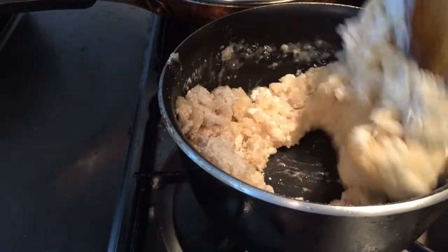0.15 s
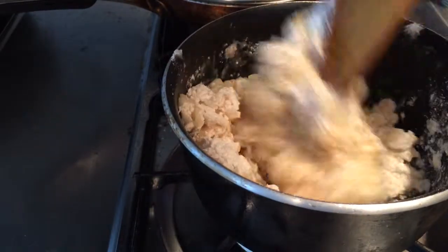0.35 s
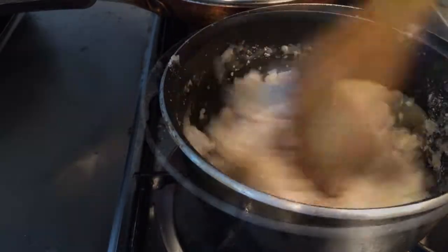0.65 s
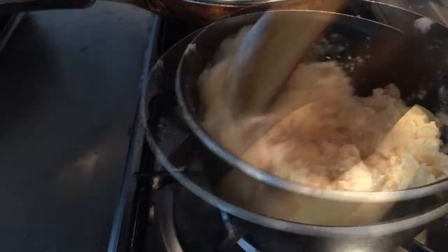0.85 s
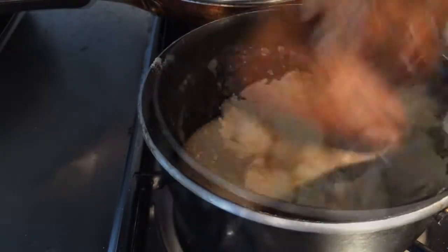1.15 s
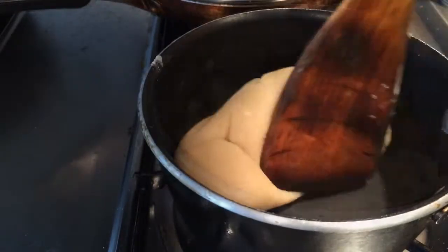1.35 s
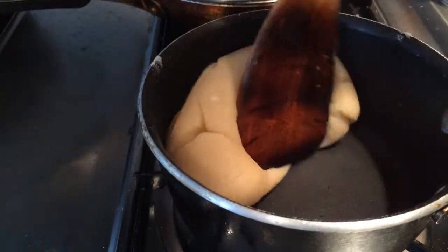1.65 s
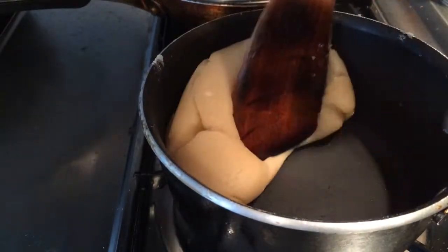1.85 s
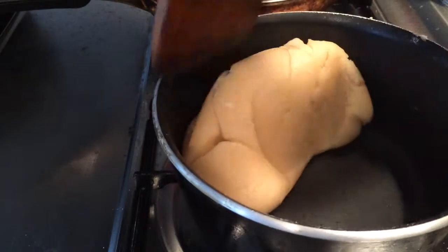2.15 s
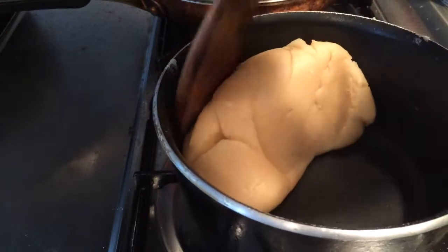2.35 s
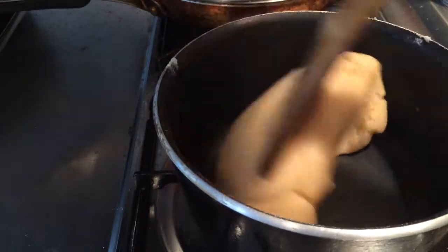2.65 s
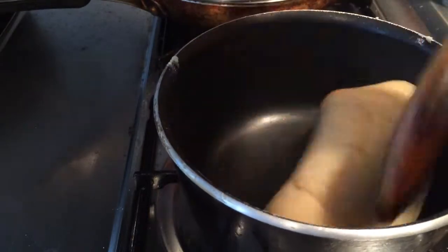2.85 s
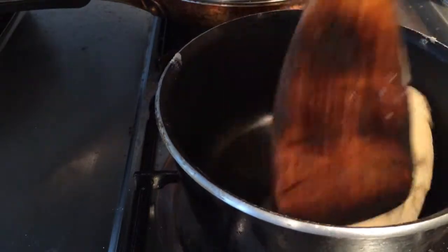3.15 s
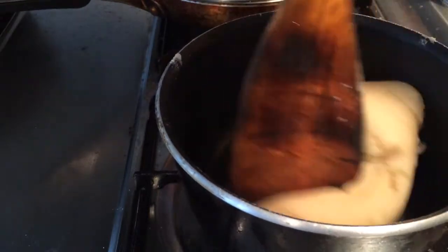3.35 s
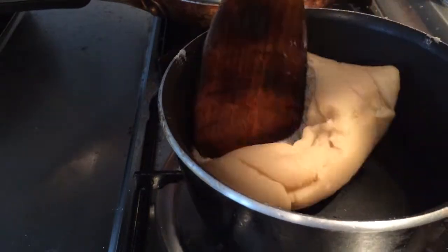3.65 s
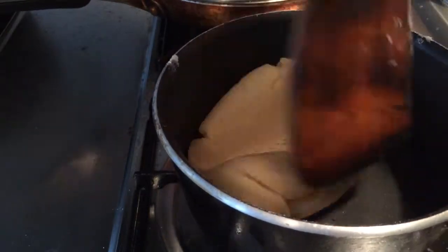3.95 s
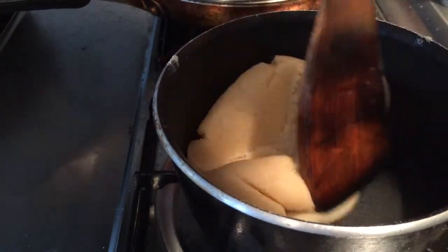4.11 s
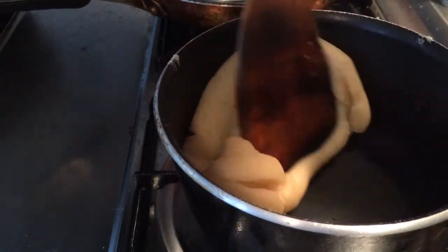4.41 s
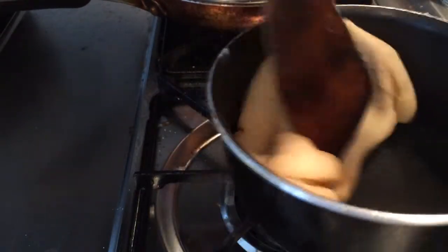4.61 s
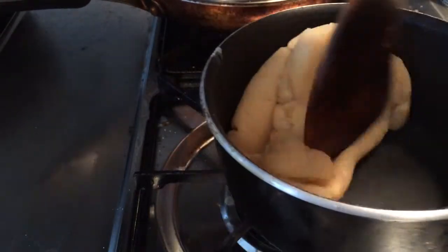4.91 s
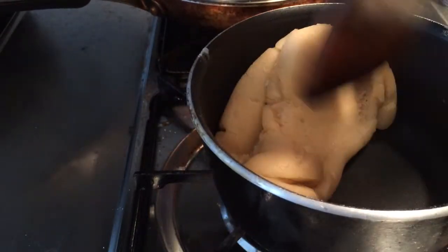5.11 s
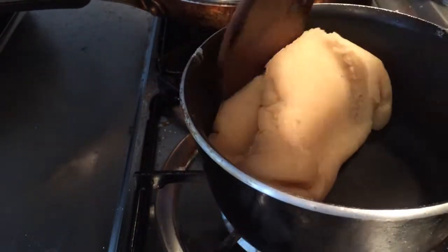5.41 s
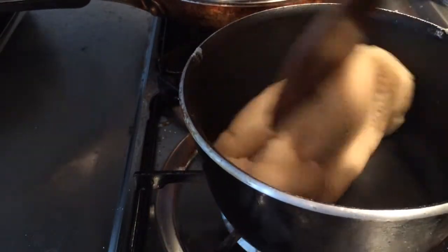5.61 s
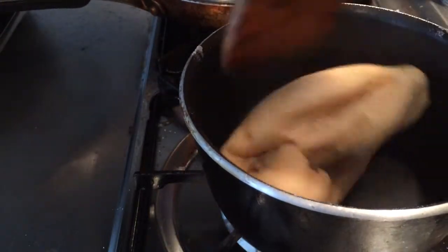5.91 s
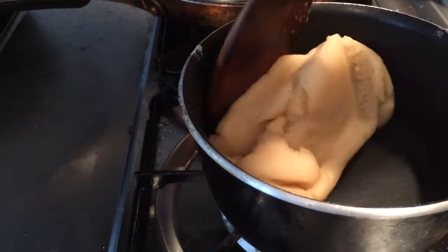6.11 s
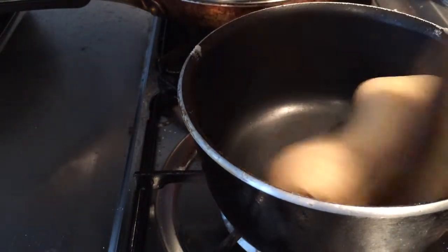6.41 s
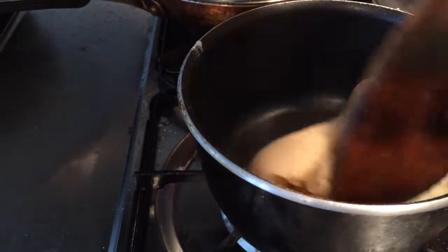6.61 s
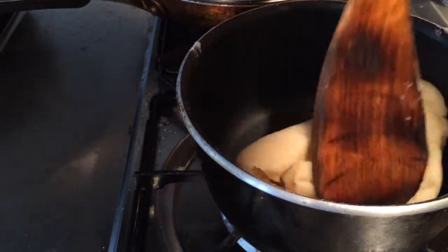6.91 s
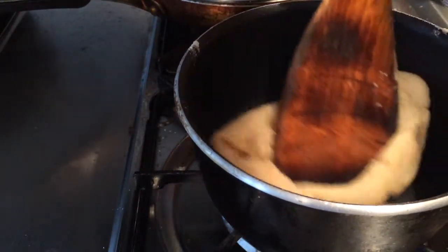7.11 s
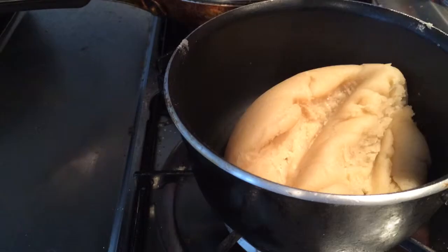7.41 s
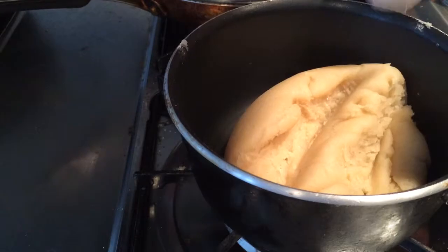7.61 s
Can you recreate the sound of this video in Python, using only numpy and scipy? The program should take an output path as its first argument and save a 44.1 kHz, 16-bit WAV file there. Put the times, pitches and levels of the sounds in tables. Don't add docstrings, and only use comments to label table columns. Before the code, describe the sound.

Close to a phone microphone in a small kitchen, a wooden spoon drags through crumbly dough with hiss, snaps and a faint gas whistle. The whistle and crumbs stop after about a second. Dull, short wood knocks make the pan ring, with scrapes between. Hard shoves rock and crack the pan on its grate midway, a very firm knock follows, then a tiny dropout and a bright, hard set-down.

```python
import sys
import numpy as np
from scipy import signal
from scipy.fft import rfft, irfft, next_fast_len
from scipy.io import wavfile
from scipy.ndimage import uniform_filter1d

SR = 44100
rng = np.random.default_rng(int(sys.argv[2]) if len(sys.argv) > 2 else 0)


def waveform_to_disk(signal):
    frames = np.transpose(np.atleast_2d(signal))
    scaled = np.clip(frames, -1, 1) * 32767
    samples = np.round(scaled).astype(np.int16)
    wavfile.write(sys.argv[1], SR, samples)


def convert_level_to_amplitude(level_db):
    exponent = np.asarray(level_db, float) / 20
    return 10 ** exponent


N = 342237
SWELL_DB = -16


def power(db):
    return convert_level_to_amplitude(2 * db)


def evened(x):
    return x / np.sqrt(np.mean(x ** 2) + 1e-20)


def read(points, hz):
    point_hz, value = np.transpose(points)
    return np.interp(np.log(hz + 1), np.log(point_hz + 1), value)


def add(mix, s, sound):
    part = mix[round(s * SR):][:len(sound)]
    part += sound[:len(part)]


def band(x, edges):
    return signal.sosfilt(signal.butter(3, edges, "bandpass", fs=SR, output="sos"), x)


def colour(x, spectrum):
    size = next_fast_len(len(x), real=True)
    gain = convert_level_to_amplitude(read(spectrum, np.fft.rfftfreq(size, 1 / SR)))
    return irfft(rfft(x, size) * gain, size)[:len(x)]


def resonate(x, peaks, through):
    size = next_fast_len(len(x), real=True)
    f = np.fft.rfftfreq(size, 1 / SR)
    gain = through + sum(convert_level_to_amplitude(db) / (1 + 2j * (f - hz) / width) for hz, width, db in peaks)
    return irfft(rfft(x, size) * gain, size)[:len(x)]


def patchy(spectrum, patch_db, flicker_db):
    frames, hz = N // 128 + 5, np.fft.rfftfreq(512, 1 / SR)
    real, imaginary, patches = rng.standard_normal((frames, 257, 3)).T
    patches = uniform_filter1d(patches, size=8, axis=0)
    patches = evened(uniform_filter1d(patches, size=14, axis=1))
    flicker = evened(uniform_filter1d(rng.standard_normal(frames), size=4))
    level_db = read(spectrum, hz)[:, None] + patch_db * patches + flicker_db * flicker
    bins = (real + 1j * imaginary) * convert_level_to_amplitude(level_db)
    return signal.istft(bins, nperseg=512, noverlap=384)[1][:N]


def slips(per_s, spread_db):
    size = convert_level_to_amplitude(spread_db * np.minimum(rng.exponential(1, N), 4))
    sign = rng.choice([-1., 1.], N)
    return evened(size * sign * (rng.random(N) < per_s / SR))


def swells(rows):
    t = np.arange(0, N / SR, 1 / 1000)
    peak_s, db, swell_s, fade_s = np.array(rows).T[:, :, None]
    away = np.where(t < peak_s, (peak_s - t) / swell_s, (t - peak_s) / fade_s)
    roundness = 1.135
    total = (convert_level_to_amplitude(db + SWELL_DB * away ** roundness) ** 2).sum(0)
    return np.interp(np.arange(N) / SR, t, total)


# pitch in Hz, level in dB per Hz.
AIR = [(15, -51), (25, -16.5), (120, -0.5), (170, -17.5), (235, -6.5), (307, -6.5), (333, -17), (461, -16),
       (557, -17.5), (3680, -32), (4100, -28.5), (4450, -35.5), (15800, -37)]
# pitch in Hz, level in dB.
HUM = [(145.3, -72), (193.8, -66.5), (457.6, -72.5), (2105, -85.5), (3144, -90.5), (4124, -82)]
# time in seconds, level in dB.
WHISTLE = [
    (0, -67),
    (.9, -66),
    (1.1, -100),
    (8, -100),
]


def kitchen():
    t, white = np.arange(N) / SR, rng.standard_normal(N)
    draught = patchy([(20, 0), (20000, 0)], 2.0, .8)
    air = convert_level_to_amplitude(-59) * evened(colour(draught, AIR))
    width_hz = 4.4
    hum = resonate(white, [(hz, width_hz, db) for hz, db in HUM], 0) / np.sqrt(np.pi * width_hz / SR)
    whistle = evened(resonate(white, [(5790, 120, 0)], 0))
    return air + hum + convert_level_to_amplitude(np.interp(t, *np.transpose(WHISTLE))) * whistle


# peak in seconds, pressure in dB, swell in seconds, fade in seconds.
DRAGS = [(0.0, -42.5, .05, 0.13), (.078, -42.5, .06, 0.059), (.5, -55, .1, .15), (.805, -44, 0.044, .16),
         (.97, -42.5, .04, 0.16), (1.31, -51.5, .09, .1), (1.42, -54, .08, 0.27), (1.848, -62, .05, 0.052),
         (2.32, -58.5, .12, 0.28), (2.888, -59, .09, 0.15), (3.33, -55.5, .04, 0.13),
         (3.47, -52.5, .1, 0.051), (3.71, -52.5, .045, 0.067), (3.87, -48, .1, 0.073),
         (4.07, -67, .15, .15), (4.572, -42, .012, .02), (4.545, -60, .09, .05), (4.643, -29, .025, 0.016),
         (4.71, -34, .08, 0.017), (5.34, -55, .06, 0.22), (5.812, -59, .09, 0.092), (5.91, -62, .06, .03),
         (6.17, -48, .06, .18), (6.5, -51.5, .07, 0.063), (7.26, -62, .14, .06)]
# peak in seconds, pressure in dB,
# swell in seconds, fade in seconds, share felt on the base in dB.
BITES = [(.28, -55, .3, 0.54, 0), (.694, -51, .075, 0.15, -0.5), (1.19, -58, 0.06, 0.092, -9),
         (1.962, -35.5, 0.024, 0.09, -12.5), (2.015, -37, 0.059, 0.055, -10), (2.07, -52, .03, .05, 2),
         (2.605, -56, 0.1, 0.056, -5.5), (3.152, -62, .01, 0.053, -3), (3.284, -50.5, 0.018, 0.06, 1.5),
         (3.588, -46, 0.075, 0.048, 4.5), (4.589, -34, 0.017, 0.11, -2.5), (4.67, -38, .04, 0.084, 5.5),
         (4.81, -46.5, .1, 0.08, -4.5), (5.108, -44, 0.15, 0.056, -3), (5.505, -50.5, 0.18, .035, -1),
         (5.63, -61, 0.13, 0.16, -3.5), (6.612, -50, 0.023, 0.074, -2), (7.068, -61.5, 0.075, 0.079, -3.5),
         (7.347, -36.5, 0.035, 0.12, -3.5), (7.5, -59, .1, .15, -6)]


def spoon_pressure():
    drags = swells(DRAGS)
    bites = swells([row[:4] for row in BITES])
    bites_on_base = swells([(s, db + share_db, swell_s, fade_s) for s, db, swell_s, fade_s, share_db in BITES])
    return drags, bites, drags + bites_on_base


# pitch in Hz, level in dB per Hz.
RUB = [(180, -42), (300, -11.5), (484, 0), (937, 4.5), (1280, 2.5), (2880, -3.5), (3020, -7.5), (4570, -8),
       (7620, -10), (15500, -21)]
# pitch in Hz, width in Hz, level in dB.
RUB_RING = [(659, 77, -10), (962.5, 90, -3), (1682, 90, -4), (1979, 30, -0.5), (2170, 72, -7.5),
            (3140, 260, -1.5), (3554, 340, -3), (5100, 160, -8), (6280, 200, -11.5), (7740, 540, -3.5)]


def scrape(drags, bites, on_base):
    rub = evened(colour(slips(5000, 2.5), RUB)) + 1.2 * evened(patchy(RUB, 4.0, 1.0))
    pan = resonate(rub, RUB_RING, 0.69)
    base, side = band(pan, (300, 1800)), band(pan, (1800, 9000))
    on_side = bites + drags * power(-5)
    return np.sqrt(on_base) * evened(base) + np.sqrt(on_side) * evened(side)


# pitch in Hz, level in dB per Hz.
HISS = [(1180, -35), (2000, -7.5), (2410, -15), (3670, -6), (4180, -7.5), (5590, -3), (13600, -1.5),
        (15500, -3.5)]
# peak in
# seconds, hiss in dB, swell in seconds, fade in seconds.
PEELS = [(0.0, -46.5, .05, 0.18), (.22, -55, 0.43, 0.65), (.6, -60.5, 0.33, 0.62), (1.02, -46, 0.15, 0.1),
         (1.69, -64.5, 0.2, 0.16), (1.79, -56.5, 0.071, 0.1), (2.38, -65, .12, 0.085),
         (2.598, -43, 0.069, 0.09), (2.888, -59, 0.38, 0.037), (3.5, -58, 0.28, .1), (3.76, -69, 0.13, .1),
         (3.83, -48.5, 0.057, 0.034), (3.954, -59.5, 0.036, .045), (4.112, -62.5, .07, 0.065),
         (4.43, -57, 0.19, .3), (4.54, -53.5, 0.092, .1), (4.655, -31, 0.063, 0.03),
         (5.33, -59.5, 0.036, .2), (5.614, -48.5, 0.083, 0.18), (5.8, -58.5, 0.22, 0.037),
         (6.01, -57, 0.13, 0.14), (6.07, -48, .02, .08), (1.365, -50, .02, .08), (6.29, -55, 0.038, 0.18),
         (6.49, -52.5, 0.088, .05), (7.2, -59.5, 0.13, 0.23), (6.72, -66.5, 0.13, 0.11)]


def dough_hiss(drags, bites):
    hiss = evened(patchy(HISS, 2.5, 2.9)) + 0.33 * evened(colour(slips(1500, 4.0), HISS))
    peeling = swells(PEELS) + drags * power(-11.5) + bites * power(-5.5)
    return np.sqrt(peeling) * evened(hiss)


# pitch in Hz, level in dB per Hz.
ROCK = [(15, -49), (35, -18), (70, 0), (200, 0), (267, -12), (354, -2.5), (418, -14.5), (700, -7.5),
        (910, -32.5), (1540, -120)]
# pitch in Hz, width in Hz, level in dB.
ROCK_RING = [(68.4, 25, -0.5), (147, 30, -3.5), (217, 17, 1), (233, 19, -4.5), (345, 66, -6),
             (420, 25, -5.5)]
# peak in seconds, level in dB, fade in seconds.
SHOVES = [(.04, -46.5, 0.19), (.5, -48, 0.22), (1.33, -50, 0.28), (1.7, -58, 0.55), (2.27, -57, 0.16),
          (3.32, -47.5, 0.17), (3.86, -40.5, 0.092), (4.02, -56.5, 0.11), (4.6, -41.5, 0.09),
          (4.68, -30, 0.069), (6.15, -53, 0.17), (7.356, -50, 0.16)]


def rocking(on_base):
    bumps = resonate(colour(slips(600, 2.0), ROCK), ROCK_RING, .4)
    shoves = swells([(s, db, .55 * fade_s, fade_s) for s, db, fade_s in SHOVES])
    moving = shoves + on_base * power(-9.5) + power(-64.5)
    return np.sqrt(moving) * evened(bumps)


def strokes():
    drags, bites, on_base = spoon_pressure()
    return scrape(drags, bites, on_base) + dough_hiss(drags, bites) + rocking(on_base)


# peak in seconds, level in dB,
# swell in seconds, fade in seconds, pitch in Hz.
SINGS = [(.05, -52, .06, .08, 3400), (.08, -50, .05, .05, 1500), (.81, -54, .03, .1, 3700),
         (.81, -50, .03, .08, 950), (.98, -52, .04, .09, 2150), (1.01, -54, .07, .06, 6250),
         (1.01, -54, .07, .06, 7700), (1.31, -60, .06, .04, 3100), (1.965, -40, .018, .03, 3050),
         (2.008, -37, .03, .03, 3310), (2.03, -43, .03, .05, 3050), (1.985, -41, .03, .04, 5100),
         (2.0, -44, .05, .07, 1720), (1.99, -47, .05, .05, 7700), (2.02, -48, .03, .05, 807),
         (3.59, -50, .05, .05, 980), (4.645, -26, .02, .03, 974), (4.61, -37, .03, .03, 2940),
         (4.655, -35, .03, .03, 3000), (4.65, -36, .03, .04, 7490), (4.61, -40, .03, .05, 5800),
         (4.7, -30, .015, .02, 974), (4.72, -44, .03, .06, 3200), (4.812, -41, .01, .025, 1670),
         (5.1, -50, .04, .04, 904), (5.1, -49, .06, .04, 1990), (5.08, -52, .05, .05, 3630),
         (5.1, -55, .04, .04, 2720), (5.07, -55, .05, .06, 5630), (5.48, -50, .08, .07, 1990),
         (5.5, -51, .08, .04, 958), (5.4, -60, .06, .04, 1560), (5.84, -58, .06, .07, 980),
         (6.61, -46, .015, .04, 1800), (6.63, -46, .03, .04, 1670), (6.495, -52, .03, .02, 950),
         (7.355, -42, .03, .06, 1990), (7.355, -43, .03, .05, 900), (6.61, -55, .02, .03, 5300)]


def singing():
    out, grit = np.zeros(N), rng.standard_normal((len(SINGS), 12000))
    t = np.arange(-6000, 6000) / SR
    for (s, db, swell_s, fade_s, hz), noise in zip(SINGS, grit):
        mode = evened(resonate(noise, [(hz, .04 * hz, 0)], 0))
        away = np.where(t < 0, -t / swell_s, t / fade_s)
        sound = mode * convert_level_to_amplitude(db - 4.5 + SWELL_DB * away ** 2)
        early = max(6000 - round(s * SR), 0)
        add(out, s - (6000 - early) / SR, sound[early:])
    return out


# time in seconds, peak in dB, pitch in Hz.
SNAPS = [(0.2094, -39, 5750), (0.2444, -41, 2110), (0.3094, -39, 5760), (0.3694, -42, 3210),
         (0.5294, -35, 2200), (0.6539, -37, 2040), (0.6894, -35, 2000), (0.7154, -33, 4210),
         (1.1464, -45, 5780), (1.1892, -44, 3350), (1.4094, -40, 2050), (1.5944, -46, 2070),
         (1.7114, -46, 2270), (1.7394, -50, 2310), (2.3545, -42, 11000), (2.5311, -36, 11700),
         (2.7322, -41, 11500), (2.7467, -41, 12900), (2.8609, -45, 11200), (4.1011, -40, 12200),
         (4.4089, -38, 8040), (4.5191, -36, 13200), (5.7894, -39, 7530), (5.8094, -49, 2300),
         (5.9344, -43, 12000), (6.2244, -45, 2300)]
# time in seconds, peak in dB, pitch in Hz.
CRACK = (4.6923, 0, 3200)
# time in seconds, level in dB.
CRUMBS = [
    (0, -60),
    (.5, -60),
    (1.0, -62),
    (1.3, -78),
    (7.7, -80),
]


def snaps():
    out, t = np.zeros(N), np.arange(300) / SR
    for s, db, hz in SNAPS + [CRACK]:
        add(out, s, convert_level_to_amplitude(db - 8) * np.sin(2 * np.pi * hz * t) * np.exp(-t * hz / 1.5))
    crackle = evened(band(slips(150, 4.0), (900, 12000)))
    return out + crackle * convert_level_to_amplitude(np.interp(np.arange(N) / SR, *np.transpose(CRUMBS)))


BLOW_BANDS = [
    (900, 2200),
    (60, 400),
    (400, 900),
    (2200, 5500),
    (5500, 15500),
]


def blow(row, modes, contact_s, rattle_db, crack_s, scatter_db, scatter_s, spread_db, dull_hz, treble_s):
    s, body_db, *others_db = row
    t = np.arange(5000) / SR
    luck, turn = rng.standard_normal(len(modes)), rng.random(len(modes))
    rung = np.zeros(len(t))
    for (hz, db, t60), u, start in zip(modes, luck, turn):
        rung += convert_level_to_amplitude(db + spread_db * u - 60 * t / t60) * np.sin(2 * np.pi * (hz * t + start))
    fall = np.exp(-t / crack_s) + convert_level_to_amplitude(scatter_db) * np.exp(-t / scatter_s)
    rattle = rng.standard_normal(len(t)) * fall
    sound = (rung + convert_level_to_amplitude(rattle_db) * rattle) * np.minimum(t / contact_s, 1) ** 2
    sound[round(contact_s * SR)] += convert_level_to_amplitude(rattle_db + 16)
    pole = np.exp(-2 * np.pi * dull_hz / SR)
    sound = signal.lfilter([1], np.convolve([1, -pole], [1, -pole]), sound)
    parts = [band(sound, edges) for edges in BLOW_BANDS]
    parts[-1] = parts[-1] * np.exp(-t / treble_s)
    out = np.zeros(len(t))
    for part, db in zip(parts, (0, *others_db)):
        loudest = np.sqrt(uniform_filter1d(part ** 2, size=260).max())
        out += convert_level_to_amplitude(body_db + db - 8.5) * part / loudest
    return s, out


# time in seconds, force in dB, then heft on the hob,
# hollow wood and hard edge in dB relative to force.
KNOCKS = [(0.4888, -24, -18, -3.5, -7.5), (0.4924, -26, -23, -3.5, -10.5), (1.3484, -9, -26, -11.5, -7.5),
          (1.3604, -18, -16.5, -5, -19), (2.4074, -24, -30, -2.5, -9.5), (3.4387, -27.5, -27, -0.5, -12),
          (3.4438, -27.5, -24, -14, -15), (3.8348, -25, 1, -4, -7.5), (3.8536, -19.5, -8, -5.5, -9),
          (3.8584, -21, -9, -5.5, -9), (4.5735, -21, -3.5, -8.5, 1.5), (4.6737, -17.5, -15.5, -5.5, -1.5),
          (6.0513, -2.5, -31, -13.5, -4), (6.0572, -7.5, -25.5, -9.5, -12),
          (6.0955, -17.5, -18, -4.5, -14.5), (6.1176, -21.5, -7, 0, -7), (6.5146, -21, -21.5, -4, -17.5)]
# time in seconds, force in dB, then hollow wood and hard edge
# in dB relative to force.
TAPS = [
    (0.5689, -37.5, -0.5, -10),
    (1.297, -37.5, -2, -12.5),
    (1.6556, -52, -7, -13),
    (1.8372, -48, 1, -17),
    (2.2739, -46.5, 8, -4.5),
    (3.1515, -52, 6, -3),
    (3.2685, -50, -9, 2),
    (6.039, -44.5, -6, -11.5),
    (3.706, -44, -3, -10),
]
# pitch in Hz, level in dB, time to fall 60 dB in seconds.
WOOD = [(466, -11, 0.029), (693, -7.5, 0.028), (876, -10.5, 0.035), (1076, -11, 0.034), (1270, -5.5, 0.026),
        (1575, -4.5, 0.026), (1786, -6, 0.019), (2283, -11, 0.039), (3070, -7, 0.041), (3515, -15, 0.045),
        (4430, -15.5, 0.024), (4935, -22, .03), (6300, -23.5, .03), (7800, -21.5, .03),
        (9600, -17.5, 0.048)]


def knocks():
    out = np.zeros(N)
    rows = [(s, db, heft, hollow, edge, edge - 8.5) for s, db, heft, hollow, edge in KNOCKS]
    rows += [(s, db, -9, hollow, edge, edge - 3.5) for s, db, hollow, edge in TAPS]
    for row in rows:
        add(out, *blow(row, WOOD, contact_s=0.00042, rattle_db=0.62, crack_s=0.0073, scatter_db=-13.5,
                       scatter_s=0.028, spread_db=2.5, dull_hz=3500, treble_s=.007))
    return out


def ring_out(rows):
    out, t = np.zeros(N), np.arange(14000) / SR
    for s, hz, db, t60 in rows:
        pair = np.sin(2 * np.pi * hz * t) + 0.33 * np.sin(2 * np.pi * hz * 1.012 * t)
        add(out, s, convert_level_to_amplitude(db - 60 * t / t60) * pair * np.minimum(t / 0.00033, 1))
    return out


# time in seconds, pitch in Hz,
# level in dB, time to fall 60 dB in seconds.
PAN_RINGS = [(.489, 1047, -26, 0.054), (.489, 645, -36, 0.18), (.489, 2900, -39, 0.084),
             (.489, 1370, -29, 0.046), (1.349, 953, -39.5, 0.42), (1.35, 1240, -27, 0.15),
             (1.349, 1500, -12, 0.028), (2.273, 474, -39, 0.079), (2.408, 690, -17.5, 0.026),
             (2.408, 2627, -39, .035), (3.44, 2700, -42, .04), (6.516, 3300, -40, .025),
             (6.516, 1450, -30, .03), (6.517, 2300, -36, .04), (3.44, 683, -42, 0.35),
             (3.44, 986, -35, 0.047), (3.852, 2930, -33, 0.094), (3.854, 1987, -44, 0.3),
             (3.854, 792, -33.5, 0.15), (4.575, 2240, -25, 0.048), (4.575, 575, -26, 0.029),
             (6.0515, 1265, -11.5, .055), (6.0515, 1825, -14, .03), (6.0515, 4409, -27, .06),
             (6.0515, 2288, -25, .08), (6.0515, 3542, -30, .05), (6.052, 482, -24, 0.091),
             (6.052, 567, -21.5, 0.051), (6.096, 720, -21.5, 0.035), (6.118, 600, -33, 0.06),
             (6.517, 483, -34, 0.089), (6.517, 2720, -36, 0.035), (6.517, 1710, -35, 0.066),
             (6.517, 880, -26, 0.02), (1.35, 480, -23, .09), (1.349, 1114, -31, .11),
             (1.349, 1965, -24, .07), (1.349, 3564, -32, .05), (1.349, 2261, -36, .2),
             (3.44, 1674, -40, .1), (3.44, 1986, -41, .09), (3.44, 2266, -44, .09), (1.298, 900, -39, .03),
             (6.605, 1850, -42, .05)]


def pan_rings():
    return ring_out(PAN_RINGS)


# time in seconds, force in dB, then heft, edge and tick
# in dB relative to force.
CLANKS = [
    (0.7058, -37, -18, -2.5, -17),
    (3.2814, -41.5, 3, 5.5, 8),
    (4.596, -28, -18, -6, 2),
    (4.692, -18, -16, 6.5, 0),
    (4.81, -35, -20, -5, -8),
    (7.6615, -18.5, -7, -5, -17),
]
# time in seconds, force in dB, then edge and tick in dB relative to force.
RIM_TOUCHES = [
    (1.77, -38, 5.5, 7.5),
    (3.811, -43, -1.5, 5),
    (7.623, -60, 8, 10),
]
# pitch in Hz, level in dB, time to fall 60 dB in seconds.
STEEL = [(824, -11.5, 0.048), (1462, -7.5, 0.046), (2356, -12, .04), (3150, -14.5, 0.027), (3554, -7, 0.02),
         (4680, -16.5, 0.012), (6410, -3.5, 0.033), (8100, 6, 0.02), (8690, -3, 0.067), (9960, 0.5, 0.025),
         (12250, 2, 0.034)]


def clanks():
    out = np.zeros(N)
    rows = [(s, db, heft, -5, edge, tick) for s, db, heft, edge, tick in CLANKS]
    rows += [(s, db, -20, -20, edge, tick) for s, db, edge, tick in RIM_TOUCHES]
    for row in rows:
        add(out, *blow(row, STEEL, contact_s=.0005, rattle_db=4.3, crack_s=0.0039, scatter_db=-16.0,
                       scatter_s=0.014, spread_db=2.5, dull_hz=12000, treble_s=.012))
    return out


# time in seconds, pitch in Hz, level in dB,
# time to fall 60 dB in seconds.
GRATE_RINGS = [
    (1.352, 152.5, -35, 0.27),
    (3.27, 241, -40.5, 0.4),
    (3.271, 454, -53, 0.46),
    (3.275, 550, -48.5, 0.35),
    (3.836, 181, -31, 0.15),
    (4.576, 173, -21.5, 0.057),
    (4.575, 320, -26.5, 0.031),
    (6.051, 136, -36.5, 0.035),
]


def grate_rings():
    return ring_out(GRATE_RINGS)


# time in seconds, force in dB, then heft, hollow,
# edge and tick in dB relative to force.
SET_DOWN = (7.644, -11, -12.5, -6, 2.5, 7.5)
# pitch in Hz, level in dB, time to fall 60 dB in seconds.
SET_DOWN_RING = [(84.5, -38.5, .25), (1950, -30.5, 0.23), (3560, -24, 0.052), (4880, -45, 0.25),
                 (6600, -41, 0.14), (8043, -19, .045), (9895, -26, .07), (11340, -20, .023)]


def set_down():
    out = ring_out([(7.647, *mode) for mode in SET_DOWN_RING])
    add(out, *blow(SET_DOWN, STEEL, contact_s=0.002, rattle_db=4.1, crack_s=0.0041, scatter_db=-13.0,
                   scatter_s=0.018, spread_db=0.6, dull_hz=13000, treble_s=.012))
    return out


# pitch in Hz, time to fall 60 dB in seconds.
ROOM = [(100, 0.4), (500, 0.28), (1500, 0.37), (4000, .33), (10000, 0.21)]
# pitch in Hz, level in dB.
WALLS = [(300, 0), (2000, 0), (6000, 0), (12000, -2)]


def room(x):
    taps = np.zeros(SR // 2)
    at = np.arange(150, len(taps) - 20, 20)
    taps[at + rng.integers(0, 20, len(at))] = rng.choice([-1., 1.], len(at))
    hz, t, bins = signal.stft(taps, SR, nperseg=256)
    dying = bins * convert_level_to_amplitude(-60 * t / read(ROOM, hz)[:, None])
    tail = signal.istft(dying, SR, nperseg=256)[1]
    return signal.fftconvolve(colour(x, WALLS), tail / np.linalg.norm(tail))[:N]


def scene():
    air, rubs = kitchen(), strokes()
    fine = singing() + snaps()
    hits = knocks() + pan_rings() + clanks() + grate_rings() + set_down()
    echo = room(convert_level_to_amplitude(-13.5) * hits + convert_level_to_amplitude(-16) * rubs)
    return (hits + rubs + echo + air + fine)[None]


def band_limit(x):
    return signal.sosfilt(signal.butter(12, 16500, fs=SR, output="sos"), x)


CUT = (7.3, 7.326, 7.3335, 7.339)


def record(dry):
    fade = np.interp(np.arange(N) / SR, CUT, (1, 0, 0, 1))
    limited = np.tanh(band(dry, (33, 20000)) * fade / 1.571) * 1.64
    treble_edge = signal.firwin(255, 15350, window=("kaiser", 7), fs=SR)
    finished = signal.oaconvolve(limited, treble_edge[None], "same")
    return band_limit(finished)


dry = scene()
out = record(dry)
waveform_to_disk(out)
```